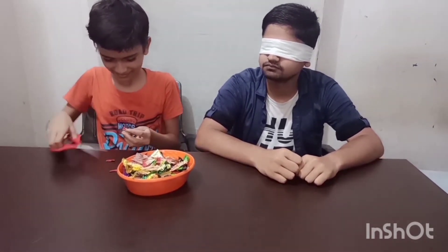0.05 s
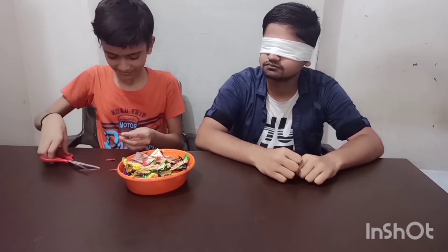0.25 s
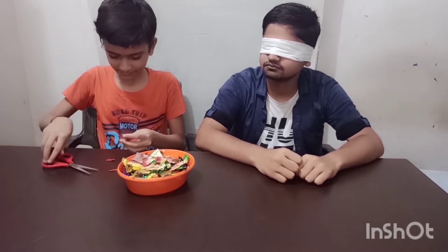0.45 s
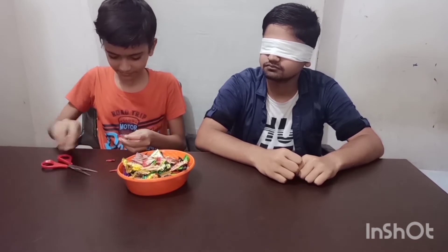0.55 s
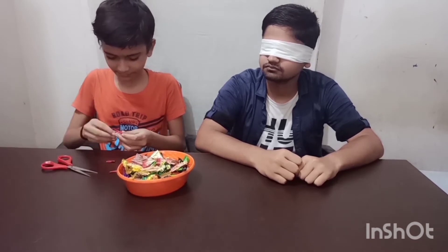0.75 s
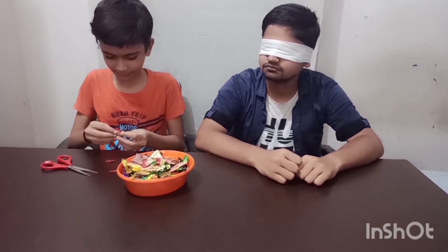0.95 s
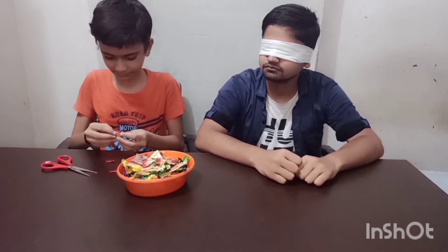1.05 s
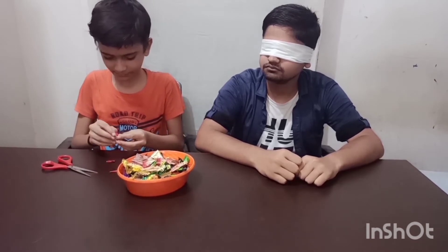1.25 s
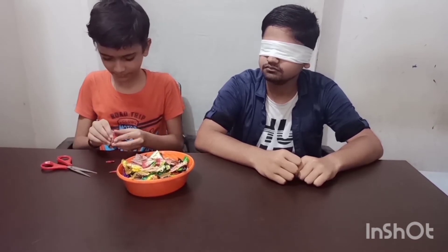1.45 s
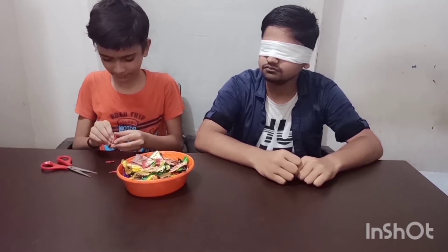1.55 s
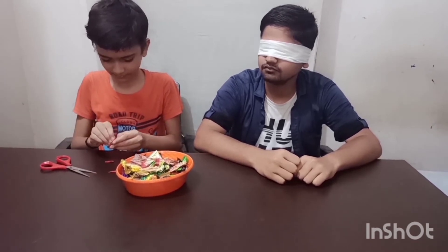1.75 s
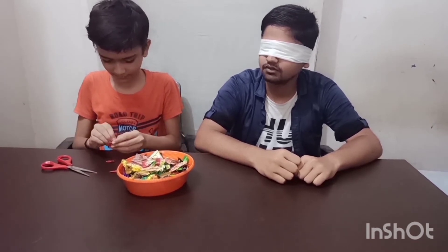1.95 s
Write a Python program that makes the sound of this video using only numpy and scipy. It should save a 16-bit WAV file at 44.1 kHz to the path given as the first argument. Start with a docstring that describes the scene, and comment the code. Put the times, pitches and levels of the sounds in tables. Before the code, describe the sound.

Scissors clatter onto a hard table, starting with sharp steel clicks at about 0.2 and 0.35 seconds. The loudest cluster of clacks, knocks and short scrapes comes from 0.5 to 0.7 seconds, ringing briefly. After a pause, fingers pick at a small wrapper, making faint rustles and crisp little snaps from 1.4 to 2 seconds. Low steady noise fills the small, slightly echoing room throughout.

```python
"""In a small bare room, steel scissors with plastic handles are put down on a hard table.
The steel scrapes and clicks, the handles drop and bounce, and each impact excites the damped
modes of the blades and the table top. Fingers then pick at a small wrapper, whose film rustles
by friction and snaps by buckling. Both sources reverberate over low room noise and a thin whine."""
import sys
import numpy as np
from scipy import signal
from scipy.fft import rfft, irfft
from scipy.io import wavfile
from scipy.ndimage import uniform_filter1d

SR = 44100
rng = np.random.default_rng(int(sys.argv[2]) if len(sys.argv) > 2 else 0)


def master(y):
    """Save y as 16-bit WAV."""
    cut = np.clip(np.atleast_2d(y).T, -1, 1)
    pcm = np.round(cut * 32767)  # scale
    wavfile.write(sys.argv[1], SR, pcm.astype(np.int16))


N = 88200
BINS = np.fft.rfftfreq(4096, 1 / SR)  # frequency axis of the body responses [Hz]
T = np.arange(SR // 2) / SR  # time axis of one event [s]


def amp(db):
    """Amplitude ratio of a level: a factor of ten for every 20 dB."""
    return 10 ** (np.asarray(db) / 20)


def unit(x):
    """Normalisation to unit energy."""
    return x / np.sqrt(np.sum(x ** 2) + 1e-20)


def read(points, hz):
    """Interpolation of a table on a logarithmic frequency axis."""
    f, value = np.transpose(points)
    return np.interp(np.log(hz + 1), np.log(f + 1), value)


def add(mix, start_s, sound):
    """Linear superposition of a sound on a stereo mix."""
    part = mix[:, max(round(start_s * SR), 0):][:, :sound.shape[-1]]
    part += sound[..., :part.shape[1]]


def sides(pan_db):
    """Level difference between the channels: positive favours the left."""
    return amp([[pan_db / 2], [-pan_db / 2]])


def minimum_phase(gain_db):
    """Minimum phase: the most compact causal impulse response with a given magnitude spectrum."""
    cepstrum = irfft(np.log(amp(gain_db)))
    half = len(cepstrum) // 2
    cepstrum[1:half] *= 2
    cepstrum[half + 1:] = 0
    return irfft(np.exp(rfft(cepstrum)))


def colour(spectrum, tilt_db=0):
    """A body as a linear filter: its impulse response, tilted by tilt_db per octave above 500 Hz."""
    octaves = np.log2(np.maximum(BINS, 500) / 500)
    return unit(minimum_phase(read(spectrum, BINS) + tilt_db * octaves))


def chatter(decay_s, body):
    """Source and filter: a decaying burst of tiny impacts excites a body."""
    fade = np.exp(-T[:len(body)] / decay_s)
    burst = rng.standard_normal(len(body)) * fade
    for _ in range(4):  # flatten the spectrum while keeping the burst short
        whitened = irfft(np.exp(1j * np.angle(rfft(burst))))
        burst = whitened * np.minimum(1, 2 * fade)
    return unit(signal.fftconvolve(burst, body))


def ring(modes):
    """Free vibration of a struck object: a sum of exponentially damped modes."""
    return unit(sum(amp(db - 60 * T / t60) * np.sin(2 * np.pi * (hz * T + rng.random()))
                    for hz, db, t60 in modes))


def friction(strokes, body, skew, slips_per_s, spread_db):
    """Stick-slip friction: random slips swell and fade in each stroke, peaking late if skew > 1."""
    out = np.zeros((2, N))
    for start, length, db in strokes:
        slips = rng.standard_normal(len(T))
        slips *= amp(spread_db * np.minimum(rng.exponential(1, len(T)), 3))
        slips *= rng.random(len(T)) < slips_per_s / SR
        swell = np.sin(np.pi * np.minimum(T / length, 1) ** skew)
        stroke = unit(signal.fftconvolve(slips * swell, body))
        add(out, start, amp(db) * np.sqrt(length * SR) * stroke)
    return out


def diffuse(size):
    """Diffuse field: noise from all around is coherent at two microphones only at long wavelengths."""
    # likeness of left and right (frequency [Hz], coherence [0 to 1])
    coherence = [(50, 0.67), (300, 0.9), (600, 0.63), (1200, 0), (3000, 0), (15000, 0)]
    left, independent = rfft(rng.standard_normal((2, size)))
    shared = np.clip(read(coherence, np.fft.rfftfreq(size, 1 / SR)), -1, 1)
    right = shared * left + np.sqrt(1 - shared ** 2) * independent
    return irfft(np.array([left, right]), size)


def room_noise():
    """Stationary diffuse noise with most of its power in the bass."""
    # noise floor (frequency [Hz], relative spectral density [dB])
    spectrum = [(15, -76), (25, -24), (49, -18.5), (114, -3), (234, -4), (290, 0.5), (314, -10),
                (388, -1.5), (420, -8.5), (627, -15), (910, -16), (1320, -20.5), (2780, -26), (9470, -34),
                (14500, -37.5)]
    noise = irfft(rfft(diffuse(N)) * amp(read(spectrum, np.fft.rfftfreq(N, 1 / SR))), N)
    return amp(-49) * noise / noise.std()


def whine(pitch_hz=15429, waver_hz=3):
    """A faint electrical tone with slight random frequency modulation."""
    waver = uniform_filter1d(rng.standard_normal(N), 2000)
    cycles = np.cumsum(pitch_hz + waver_hz * waver / waver.std()) / SR
    return amp(-64.5) * np.sqrt(2) * np.sin(2 * np.pi * cycles)


def room(x, tail_db, early_db, early_s=0.0038, build_s=0.0061):
    """Reverberation: direct sound, early reflections off the table and a tail from the bare walls."""
    # reverberation time (frequency [Hz], T60 [s])
    t60 = [(100, 0.56), (300, 0.26), (1000, 0.5), (3000, 0.32), (7000, 0.26), (15000, 0.39)]
    hz, t, spectra = signal.stft(diffuse(len(T)), SR, nperseg=256)
    decay = amp(-60 * t / read(t60, hz)[:, None])
    tail = signal.istft(spectra * decay, SR, nperseg=256)[1][:, :len(T)]
    tail *= 1 - np.exp(-T / build_s)
    early = diffuse(len(T)) * T * np.exp(-2 * T / early_s)
    direct = T == 0
    paths = direct + np.sqrt(2) * (amp(tail_db) * unit(tail) + amp(early_db) * unit(early))
    # inverting the smoothed power spectrum keeps the overall colour even
    power = uniform_filter1d(abs(rfft(paths)) ** 2, size=90, axis=1)
    equaliser = np.array([minimum_phase(-10 * np.log10(p / p.mean())) for p in power])
    response = irfft(rfft(paths) * rfft(equaliser))
    return signal.fftconvolve(x, response, axes=1)[:, :N]


def wrapper():
    """Friction and buckling: thin film rustles between the fingers and gives way in bright snaps."""
    # rubs of the film (time [s], duration [s], level [dB])
    rustles = [(1.365, 0.12, -52), (1.45, 0.083, -50.5), (1.53, 0.23, -65.5), (1.775, .11, -52.5),
               (1.89, 0.15, -64.5)]
    # buckling events (time [s], level [dB], left minus right [dB])
    snaps = [(0.072, -36, 10), (1.39, -30.5, 16), (1.4077, -19.5, -10.5), (1.428, -23, 9),
             (1.4665, -16.5, -4), (1.478, -26, 7), (1.627, -30, -1), (1.7768, -26, 8), (1.8002, -16.5, 9),
             (1.8206, -22.5, -16), (1.8227, -13, -2), (1.873, -30, 3), (1.9485, -31, -1)]
    # spectra of the rubbed and the buckling film (frequency [Hz], relative level [dB])
    rustle_spectrum = [(200, 0), (1000, -0.5), (2000, -3), (2800, 2.5), (4400, 0.5), (5400, -0.5),
                       (6500, 0), (8500, -3), (12000, -6.5), (15500, -1.5)]
    snap_spectrum = [(500, -30), (2500, -22), (4300, -11), (5600, -14.5), (6500, 7.5), (7000, -2.5),
                     (7550, 0), (8500, -7.5), (12000, -19.5), (15500, -18)]
    out = friction(rustles, colour(rustle_spectrum), skew=0.64, slips_per_s=1200, spread_db=3)
    film = colour(snap_spectrum)
    for start, db, pan_db in snaps:
        add(out, start, amp(db) * sides(pan_db) * chatter(decay_s=0.0024, body=film))
    return out


def hand_bumps():
    """Soft impact: the hand's long contact with the table excites mainly low frequencies."""
    # bumps of the hand (time [s], level [dB])
    bumps = [(.2, -18), (0.246, -18), (.335, -19), (.533, -14)]
    # spectrum of a bump (frequency [Hz], relative level [dB])
    spectrum = [(25, -28), (75, 0), (160, 4.5), (260, -1.5), (500, -18), (2000, -61), (8000, -73)]
    out = np.zeros((2, N))
    for start, db in bumps:
        add(out, start, amp(db) * chatter(decay_s=0.0062, body=colour(spectrum)))
    return out


def table_knock(pitch_hz, peak_db=10, width_octaves=0.34):
    """Driving-point response: each spot of the table top favours its own pitch when struck."""
    # spectrum of a knock (frequency [Hz], relative level [dB])
    spectrum = [(30, -35), (75, -5.5), (160, -4), (210, -6), (280, -3), (480, 0.5), (800, -0.5), (1300, -3),
                (2500, -16.5), (8000, -54.5)]
    peak = np.exp(-0.5 * (np.log2((BINS + 1) / pitch_hz) / width_octaves) ** 2)
    spot = unit(minimum_phase(read(spectrum, BINS) + peak_db * peak))
    return chatter(decay_s=0.000715, body=spot)


def steel_scrapes():
    """Sliding friction of the steel on the table top."""
    # slides (time [s], duration [s], level [dB])
    slides = [(.184, 0.016, -44), (.305, 0.029, -44.5), (.329, 0.03, -34.5), (.358, 0.035, -49),
              (.43, 0.24, -57.5), (.518, 0.028, -40), (.59, 0.055, -39)]
    # spectrum of a scrape (frequency [Hz], relative level [dB])
    spectrum = [(100, -18), (550, -1.5), (900, -4), (1300, 3.5), (2300, 1.5), (3500, -9), (5000, 1),
                (6500, -8), (8300, -1), (12000, -11), (15500, -13)]
    return friction(slides, colour(spectrum), skew=1.2, slips_per_s=6000, spread_db=2)


def scissor_impacts():
    """Impact excitation: steel clicks, handles clack, and blades and table ring in their modes."""
    # contacts (time [s], click level [dB], click tilt [dB/octave], clack level [dB],
    # knock level [dB], knock pitch [Hz], blade ring level [dB], left minus right [dB])
    contacts = [(0.2008, -5.5, 1.7, -31, -13, 800, -8.5, 6), (.2035, -8, 2.5, -14, -16.5, 830, -17.5, -6.5),
                (.2465, -11, 0, -15, -17.5, 820, -14.5, -2.5), (0.3508, -1.5, 0.2, -3, -10, 555, -26, -2),
                (.3530, -6.5, 1.5, -17, -15.5, 555, -28, 3.5), (0.5417, -11, -0.9, -8, -8.5, 305, -32, 15),
                (0.5473, -1.5, -1.5, -2, -1, 294, -19, -3), (0.549, -2, -1.3, 0.5, -1.5, 552, -32, -9),
                (0.5641, -6, 16, -12, -9, 330, -19, 5), (0.5967, -3.5, -0.5, -4, 3.5, 458, -27, 1),
                (.6360, -10, 2, -2.5, -3, 500, -33, -1.5), (0.651, -8.5, -.7, -15, -6, 290, -23, -2)]
    # spectra of the steel's click and the plastic's clack (frequency [Hz], relative level [dB])
    click_spectrum = [(100, -28), (500, -14), (1200, 3), (2500, 0), (3800, -2.5), (5000, 0), (6500, 8),
                      (7100, 2.5), (7700, 4), (8300, -0.5), (12000, -6), (15500, -6.5)]
    clack_spectrum = [(200, -26), (900, -10.5), (1400, -9), (2000, -5.5), (2900, 1.5), (3900, -1),
                      (4500, -5), (6000, -15), (15000, -27)]
    # modes of the blades and of the table top (frequency [Hz], relative level [dB], T60 [s])
    blade_modes = [(830.5, -2.5, 0.22), (800, -3.5, 0.14), (926, -3, 0.21), (1290, -13, .12),
                   (1730, -20, .12), (2300, -2, 0.055), (2535, 5.5, 0.054), (2527, -10, 0.13),
                   (2690, -8, 0.05)]
    table_modes = [(160.9, -4.5, 0.37), (268, 1, 0.37), (290, -1, 0.56), (453.3, 0, 0.11),
                   (529.4, -4.5, 0.13), (645, -5, 0.13), (828, -1, .18), (1534, 0.5, 0.14),
                   (1679, -8.5, 0.19)]
    blade_ring, table_ring = ring(blade_modes), ring(table_modes)
    out = np.zeros((2, N))
    for start, click_db, tilt_db, clack_db, knock_db, knock_hz, ring_db, pan_db in contacts:
        click = amp(click_db) * chatter(decay_s=0.00172, body=colour(click_spectrum, tilt_db))
        clack = amp(clack_db) * chatter(decay_s=0.0011, body=colour(clack_spectrum))
        knock = amp(knock_db) * table_knock(knock_hz)
        add(out, start, sides(pan_db) * (click + clack) + knock)
        add(out, start, amp(ring_db) * blade_ring + amp(knock_db - 5.5) * table_ring)
    return out


def scissors(lead_s=0.00008):
    """Arrival-time difference: the sound of putting the scissors down reaches the left side first."""
    left, right = steel_scrapes() + scissor_impacts() + hand_bumps()
    return np.array([left, np.roll(right, round(lead_s * SR))])


def scene():
    """Superposition of the reverberant scissors and wrapper on the steady background."""
    put_down = room(scissors(), tail_db=2, early_db=1)
    picking = room(wrapper(), tail_db=2.5, early_db=1.5)
    return put_down + picking + room_noise() + whine()


def record(dry, cutoff_hz=15560):
    """Linear filtering: the microphone's frequency response, then a steep low-pass band limit."""
    # microphone response with a dip in the treble (frequency [Hz], gain [dB])
    microphone = [(8300, -3.5), (8800, -10.5), (9700, -6.5), (10300, -16.5), (10900, -34), (11350, -18),
                  (11700, 0), (15000, -1.5)]
    heard = signal.fftconvolve(dry, minimum_phase(read(microphone, BINS))[None], axes=1)[:, :N]
    lowpass = signal.firwin(511, cutoff_hz, window=("kaiser", 9), fs=SR)
    return signal.oaconvolve(heard, lowpass[None], "same")


dry = scene()
out = record(dry)
master(out)
```